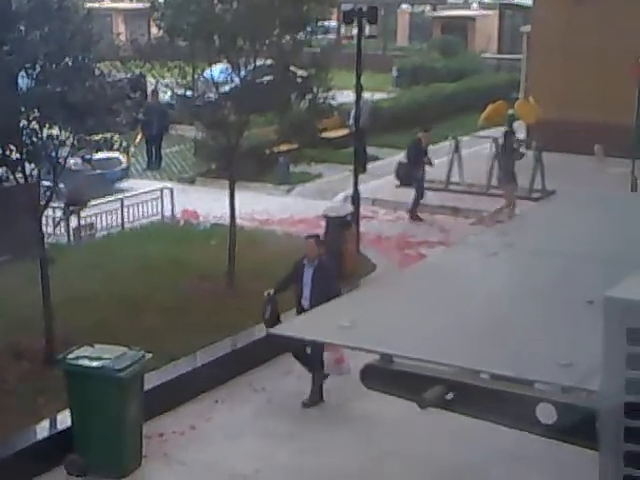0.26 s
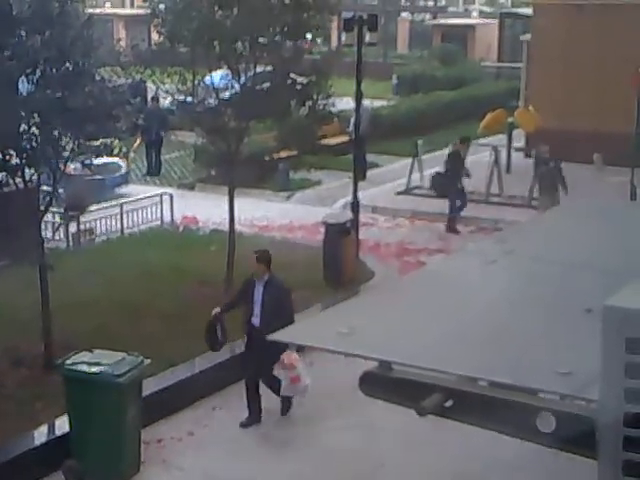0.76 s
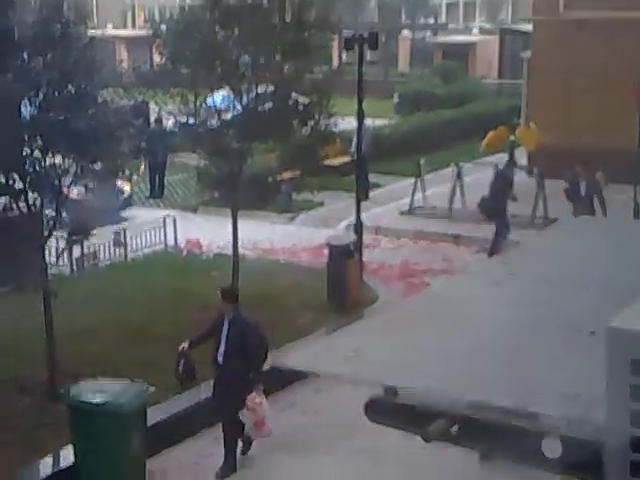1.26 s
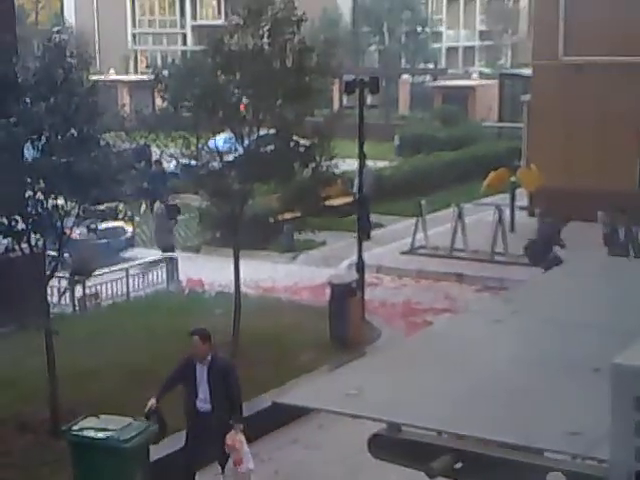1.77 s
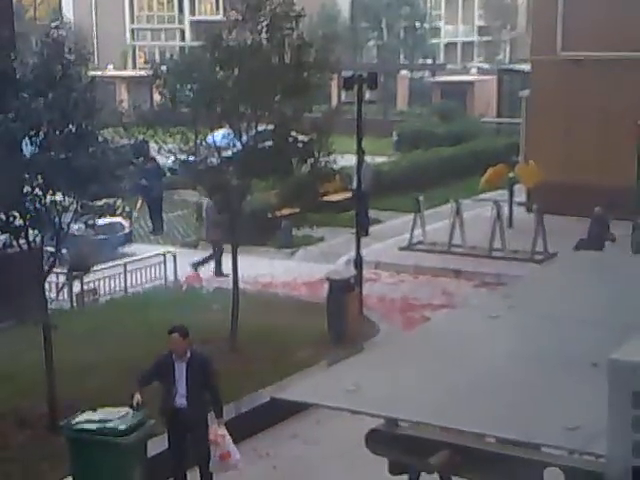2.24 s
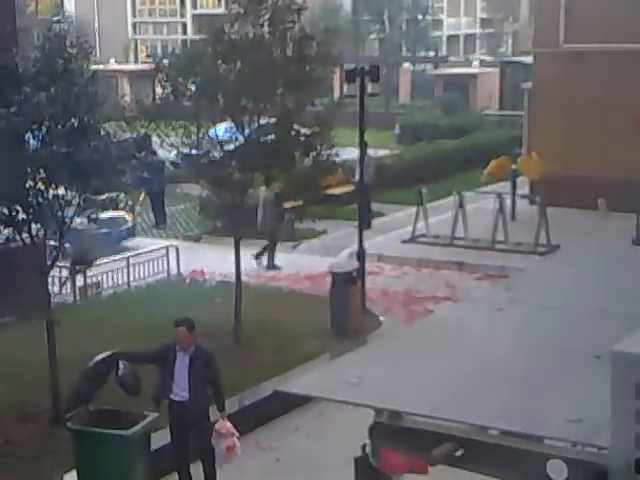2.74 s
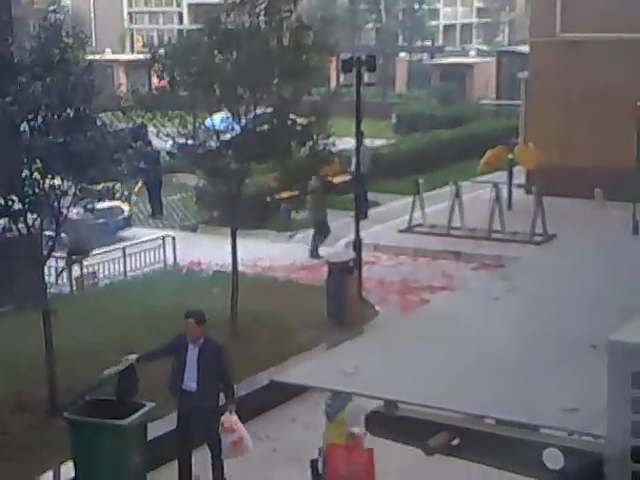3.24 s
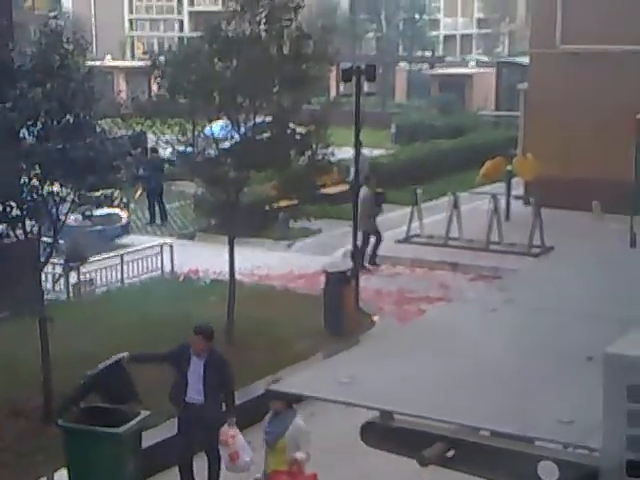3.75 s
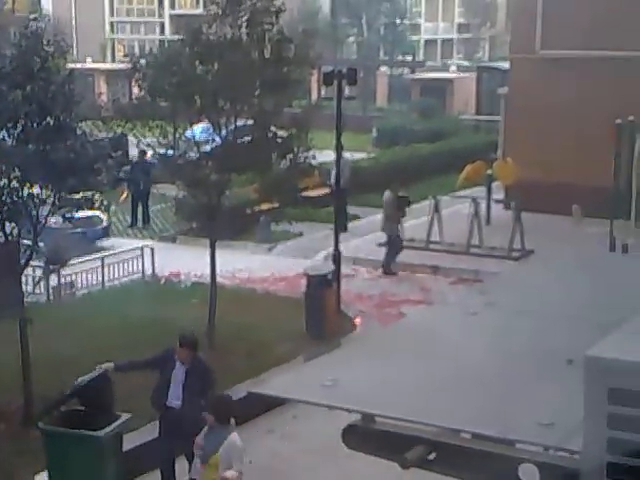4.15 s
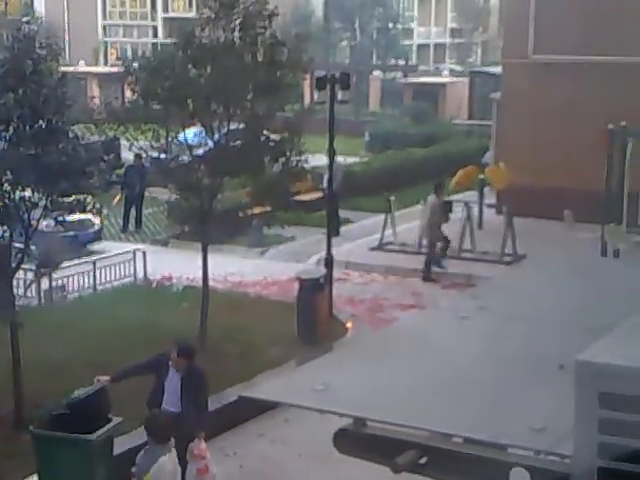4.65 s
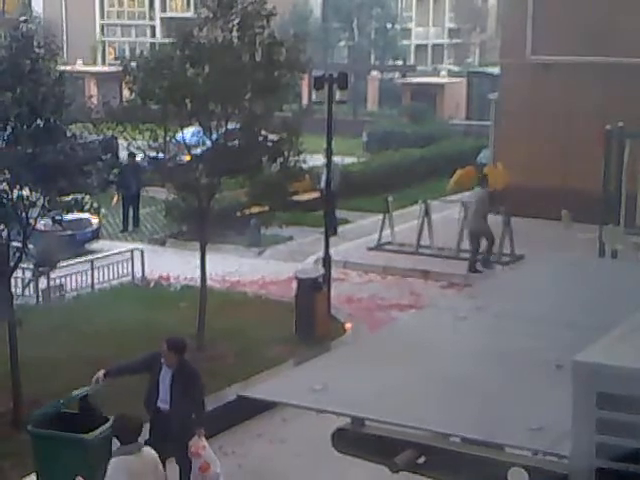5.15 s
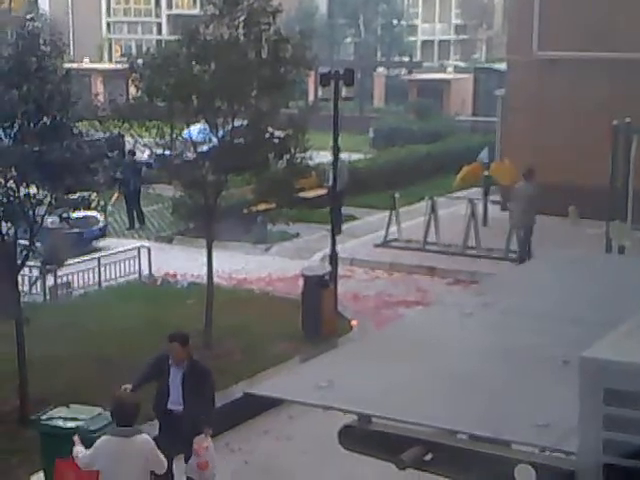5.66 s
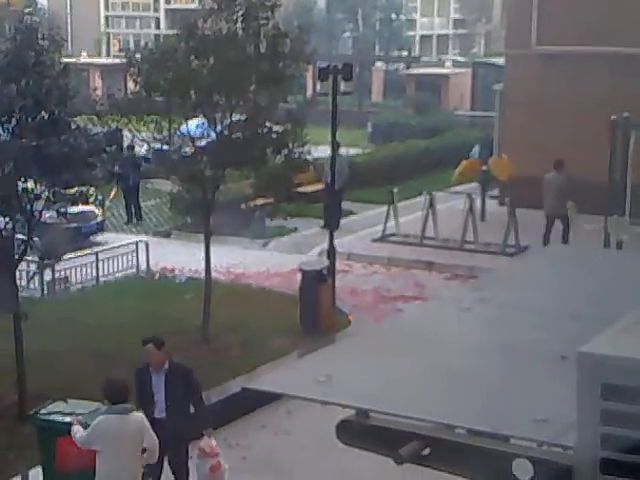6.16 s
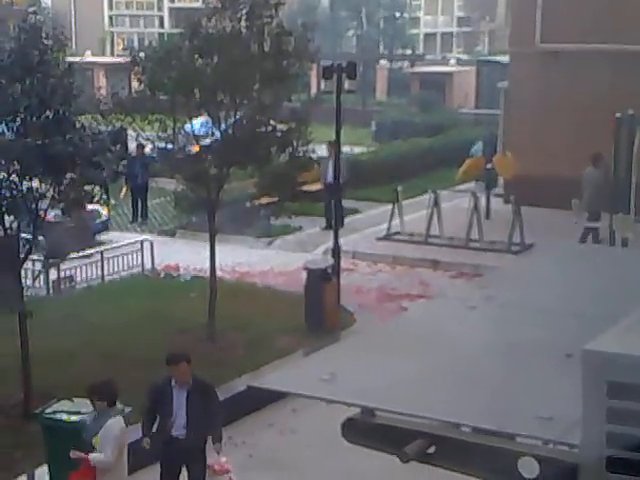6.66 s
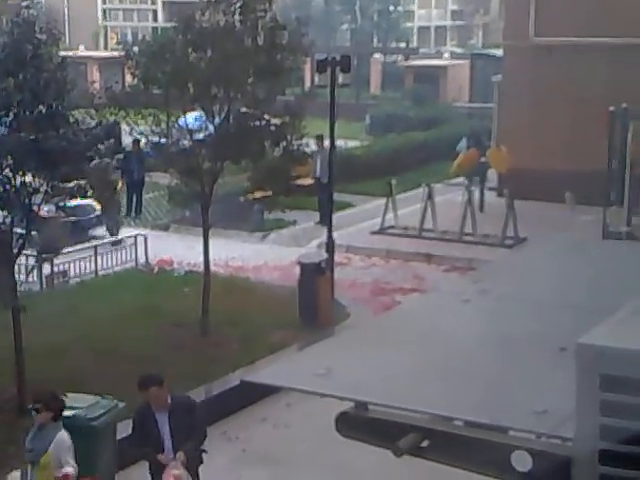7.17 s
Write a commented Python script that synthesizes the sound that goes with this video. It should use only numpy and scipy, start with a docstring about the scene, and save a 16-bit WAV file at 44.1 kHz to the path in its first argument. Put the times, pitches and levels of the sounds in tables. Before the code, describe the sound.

Heard from above in a residential courtyard: a single dry pop, then a big firecracker bang with clustered slapping echoes and a rolling tail. After a faint horn toot, a second, louder bang hits and rumbles away. Dull bumps and two hollow plastic bin lid claps follow. Faint traffic, thin whine and hiss duck after each blast, then swell back; the loudest peaks are flattened.

```python
"""Two big firecrackers go off in a courtyard between apartment blocks, heard from an upstairs microphone.
Each is a set of delayed pulses off ground and walls, then shaped noise that rolls on for over a second.
A dry pop, a single pulse, comes first; dull bumps, bin lid claps and a far horn are decaying noise and tones.
Town noise, a thin whine and hiss sink after each blast and swell back; a limiter flattens the loudest part."""
import sys
import numpy as np
from scipy import signal
from scipy.fft import rfft, irfft
from scipy.io import wavfile
from scipy.ndimage import uniform_filter1d, minimum_filter1d

SR = 44100
rng = np.random.default_rng(int(sys.argv[2]) if len(sys.argv) > 2 else 0)


def master_out(mix):
    """Clip the mix to full scale and print it as 16-bit PCM to the path in sys.argv[1]."""
    frames = np.transpose(np.atleast_2d(mix))
    ceiling = np.clip(frames, -1, 1)
    pcm = np.round(ceiling * 32767).astype(np.int16)
    wavfile.write(sys.argv[1], SR, pcm)


N = 326340
TIME = np.arange(N) / SR  # s
HZ = np.fft.rfftfreq(N, 1 / SR)


def amp(db):
    """Decibels to gain."""
    return 10 ** (np.asarray(db) / 20)


def unit(x):
    """Scales to an rms of one."""
    return x / np.sqrt(np.mean(x ** 2) + 1e-20)


def read(points, hz):
    """A spectrum table, joined on a log-frequency axis."""
    f, value = np.transpose(points)
    return np.interp(np.log(hz + 1), np.log(f), value)


def noise(spectrum):
    """Steady noise of a given colour, with an rms of one."""
    white = rng.standard_normal(N)
    return unit(irfft(rfft(white) * amp(read(spectrum, HZ)), N))


def drift(rate_hz):
    """Random wavering slower than the given rate, with an rms of one."""
    white = rng.standard_normal(N)
    return unit(irfft(rfft(white) * (HZ < rate_hz), N))


def add(mix, s, sound):
    """Mixes a sound in at a time in seconds."""
    part = mix[max(round(s * SR), 0):][:len(sound)]
    part += sound[:len(part)]


def click(gain_db):
    """Causal (minimum-phase) pulse with the given spectrum."""
    mirrored_db = np.concatenate([gain_db, gain_db[-2:0:-1]])
    log_gain = np.log(amp(mirrored_db))
    return np.fft.ifft(np.exp(np.conj(signal.hilbert(log_gain)))).real


def blow(s, rise, decay):
    """Envelope with a quick rise and an exponential fall."""
    age = np.maximum(TIME - s, 0)
    return (1 - np.exp(-age / rise)) * np.exp(-age / decay)


def held(s, length, rise, release):
    """Envelope that rises, holds and dies away."""
    age = TIME - s
    return np.clip(age / rise, 0, 1) * np.exp(-np.maximum(age - length, 0) / release)


# The two firecrackers down in the yard. Each row: start in seconds, blast level in dB, reverberation level
# in dB, factor on the echo delays, factor on the ring time, reverberation tilt in dB per octave.
BANGS = [(1.1661, -9, -14, 1.0, 0.93, 0), (3.8233, -3.5, -10, 1.035, 1.142, -0.1)]
# Paths by ground and walls to the microphone. Each row: delay in seconds before the bang's own factor,
# level in dB relative to the blast, extra bite around 5.8 kHz in dB.
PATHS = [(0, 1, -6), (.0036, -2, 8.5), (.0100, 0, 6), (0.0146, -6, 5), (0.0501, 1.5, 3), (0.057, -3, 3.5),
         (.0645, -2.5, 2), (.129, -8.5, -1.5), (.158, -8.5, -4)]
# Colour of a blast at the microphone. Each row: frequency in Hz, relative level in dB per Hz.
BLAST_COLOUR = [(30, -31), (90, -27.5), (180, -8), (260, -8), (350, -4.5), (470, -9.5), (720, 0.5),
                (1000, -3), (1300, 3), (1700, -1), (2050, -9.5), (4500, -26), (6100, -29), (8400, -45),
                (15000, -63.5)]


def firecrackers(scatter_db=-12, scatter_s=0.0026, bite_hz=5800, loss_db=90, weak_s=.11, weak_db=-11):
    """Each shock arrives by several paths, frayed by rough walls, and then fills the yard."""
    out = np.zeros(N)
    hz, t = np.fft.rfftfreq(2048, 1 / SR), TIME[:1024]
    colour_db = read(BLAST_COLOUR, hz)
    bite = np.exp(-2 * np.log2((hz + 1) / bite_hz) ** 2)
    # treble lost for each second of delay: loss_db per octave above 4 kHz
    loss = loss_db * np.log2(np.maximum(hz / 4000, 1))
    height = abs(click(colour_db)).max()
    for s, db, yard_db, stretch, ring, tilt_db in BANGS:
        # three weaker echoes fall at random within about the first tenth of a second
        weak_echoes = [(weak_s * share, weak_db, 0) for share in rng.random(size=3)]
        for delay, path_db, bite_db in PATHS + weak_echoes:
            shock = click(colour_db + bite_db * bite - delay * loss) / height
            frayed = amp(scatter_db) * rng.standard_normal(len(t)) * np.exp(-t / scatter_s)
            frayed[0] = 1
            arrival = signal.fftconvolve(shock, frayed)
            add(out, s + stretch * delay, amp(db + path_db) * arrival)
        add(out, s, amp(yard_db) * reverberation(ring, tilt_db))
    return out


# Basic ring time of the yard, before each bang's factor and the extra late fall.
# Each row: frequency in Hz, time to fall 60 dB in seconds.
YARD_RING = [(50, 1.7), (200, 1.4), (700, 1.95), (1400, 1.77), (2500, 1.684), (4000, 1.58), (6000, 1.12),
             (9000, 0.72), (15000, 0.49)]


def reverberation(ring, tilt_db, build=0.059, flutter_db=1.5, patch_db=1.0, dulling_db=11, sag_db=3,
                  air_db=9, air_s=0.13):
    """A thicket of echoes from windows and balconies; it fades ever faster, the treble first."""
    grain = amp(1.3 * drift(500))
    late = np.minimum(TIME, 1.5) ** 2  # the level flutters at random, more strongly as the tail fades
    echoes = rng.standard_normal(N) * grain * amp(flutter_db * late * drift(25))
    hz, t, z = signal.stft(echoes, SR, nperseg=512)
    colour = amp(read(BLAST_COLOUR, hz) + tilt_db * np.log2((hz + 100) / 1000))
    # random patches, smoothed over frequency and then time
    patches = uniform_filter1d(rng.standard_normal(z.shape), size=5, axis=0)
    patches = unit(uniform_filter1d(patches, size=8, axis=1))
    treble = np.clip((hz - 1700) / 700, 0, 1)[:, None]
    fall_db = -60 * t / (ring * read(YARD_RING, hz)[:, None])
    fall_db = fall_db - (sag_db + dulling_db * treble) * (t / ring) ** 3
    # the top treble dulls over the first tenths of a second
    edge_db = air_db * np.log2(np.maximum(hz / 2800, 1))[:, None] * (1 - np.exp(-t / air_s))
    z = z * unit(colour)[:, None] * amp(fall_db - edge_db + patch_db * patches)
    tail = signal.istft(z, SR, nperseg=512)[1][:N]
    return tail * (1 - .6 * np.exp(-TIME / build))  # the echoes take a moment to build up


def fizz(level_db=-43, decay_s=.052):
    """The airy top of each blast, high noise which dies within the first few bounces."""
    air = noise([(4000, -20), (7000, 0), (12000, -3), (15500, -10)])  # Hz, dB per Hz
    return air * sum(amp(level_db + yard_db) * blow(s, .002, decay_s) for s, _, yard_db, *_ in BANGS)


# Colour of echoes from distant blocks. Each row: frequency in Hz, relative level in dB per Hz.
ROLL_COLOUR = [(100, -20), (480, -12), (720, 1), (1000, -2), (1250, 0), (1700, -9), (2100, -26),
               (3500, -40), (6200, -39), (9000, -54), (15000, -64)]


def far_roll(level_db=-35, rise_s=.4, decay_s=.8, sinks=.55, flutter_db=2.2, early_s=.05):
    """Each blast comes back from distant blocks as a long, uneven murmur of echoes."""
    echoes = sum(blow(s, rise_s, decay_s) for s, *_ in BANGS)
    level = amp(level_db + sinks * lull_db(early_s) + flutter_db * drift(16))
    return level * echoes * noise(ROLL_COLOUR)


# Standing waves between the walls around the yard.
# Each row: frequency in Hz, width in Hz, level in dB relative to the incoming sound.
WALL_MODES = [(187, 16, 0), (217, 12, -7), (321, 7.9, -0.5), (715, 16, -5.5), (1170, 18, -8.5),
              (1693, 8.9, -8)]


def walls(x):
    """Facing walls make a few frequencies ring."""
    out = x
    for hz, width, db in WALL_MODES:
        b, a = signal.iirpeak(hz, hz / width, SR)
        out = out + amp(db) * signal.lfilter(b, a, x)
    return out


# Colour of the dry pop's pulse. Each row: frequency in Hz, relative level in dB per Hz.
POP_COLOUR = [(20, -19.5), (60, -3), (420, 1.5), (900, -6), (1600, -21.5), (2600, -27), (3300, -44),
              (4100, -42.5), (7000, -80), (12000, -90.5)]


def pop(s=.3074, peak_db=-4, lag_s=.0022, knee_hz=1500, tail_db=-54, tail_s=.018, boom_db=-52, boom_s=.085):
    """One dry pressure pulse, its bass a little behind its treble, with a faint, short tail and a low boom."""
    hz = np.fft.rfftfreq(4096, 1 / SR)
    lag = np.exp(-2j * np.pi * lag_s * knee_hz * np.arctan(hz / knee_hz))
    pulse = irfft(rfft(click(read(POP_COLOUR, hz))) * lag)
    out = np.zeros(N)
    add(out, s, amp(peak_db) * pulse / abs(pulse).max())
    tail = amp(tail_db) * noise(BLAST_COLOUR) * blow(s, .003, tail_s)
    boom = amp(boom_db) * noise(RUMBLE_COLOUR) * blow(s, .003, boom_s)
    return out + tail + boom


# Dull bumps, and first a faint low rustle just before the pop. Each row: start in seconds, level in dB,
# pitch in Hz, decay in seconds, scuff level in dB relative to the bump.
BUMPS = [(.27, -57.5, 201, 0.016, 1), (0.489, -56.5, 302, 0.0094, -0.5), (.648, -45, 60, 0.0075, -5),
         (2.92, -54, 120, .02, -8.5), (3.532, -34.5, 60.7, 0.024, -5.5), (5.439, -50, 170, 0.038, -5.5),
         (6.002, -42.5, 52, .03, 0), (6.75, -39.5, 239, 0.014, 1), (7.13, -28, 110, 0.0082, -14)]


def bumps(scuff_hz=520, rise_s=0.0041):
    """Each bump or rustle is a few low cycles and a soft scuff of low-passed noise."""
    low_pass = signal.butter(4, scuff_hz, fs=SR, output="sos")
    scuff = unit(signal.sosfilt(low_pass, rng.standard_normal(N)))
    out = np.zeros(N)
    for s, db, hz, decay, scuff_db in BUMPS:
        thud = np.sin(2 * np.pi * hz * (TIME - s))
        out += amp(db) * blow(s, rise_s, decay) * (thud + amp(scuff_db) * scuff)
    return out


# Knocks of the bin lid. Each row: start in seconds, relative level in dB, decay in seconds.
LID_KNOCKS = [(2.965, -66, .012), (5.701, -48, 0.013), (5.768, -40, 0.013)]
# Colour of the lid's body. Each row: frequency in Hz, relative level in dB per Hz.
LID_COLOUR = [(200, -8), (500, -10.5), (900, -5), (1300, 3), (1650, -2), (2000, -10.5), (3000, -28),
              (4500, -34), (6500, -43), (9000, -70)]


def bin_lid(wet_db=-17, ring_s=0.12, boom_db=-13, boom_s=.16):
    """A plastic lid ticks as it opens and lands in two claps; each knock has a hollow boom and a faint echo."""
    strokes, boom = np.zeros(N), np.zeros(N)
    for s, db, decay in LID_KNOCKS:
        strokes += amp(db) * (blow(s, 0.0023, decay) + amp(wet_db) * blow(s, 0.018, ring_s))
        boom += amp(db + boom_db) * blow(s, .01, boom_s)
    return amp(5.5) * noise(LID_COLOUR) * strokes + noise(RUMBLE_COLOUR) * boom


def far_horn(s=3.46, length_s=.24, rise_s=.08, hz=560, level_db=-47.5, fall_db=5, release_s=.05):
    """One short, faint toot of three harmonics that wavers in pitch and level on its way."""
    phase = 2 * np.pi * np.cumsum(hz * (1 + .014 * drift(40))) / SR
    tone = sum(amp(-fall_db * k + 3.3 * drift(6.5)) * np.sin((k + 1) * phase) for k in range(3))
    return amp(level_db) * held(s, length_s, rise_s, release_s) * tone


# Colour of distant traffic, also of the low booms. Each row: frequency in Hz, relative level in dB per Hz.
RUMBLE_COLOUR = [(20, -10.5), (45, 0), (95, 2.5), (190, -0.5), (330, -6), (550, -16.5), (1200, -42),
                 (4000, -80)]
# Colour of the town's wash. Each row: frequency in Hz, relative level in dB per Hz.
WASH_COLOUR = [(250, -7), (520, -5.5), (720, 1.5), (1000, -2.5), (1220, 0.5), (1700, -6.5), (2100, -18.5),
               (3500, -27), (8000, -50)]
# Brief swells of street noise. Each row: start in seconds, length in seconds, level in dB before wavering.
SWELLS = [(-.06, .17, -73), (.97, .2, -76.5), (3.44, .36, -49.5)]


def town(rumble_db=-49.5, wash_db=-54, waver_db=2, lumpy_db=2, rumble_sinks=1.01, wash_sinks=1.35, early_s=.06):
    """Uneven traffic rumble, and a wash whose low and high halves waver apart; each sinks by its own amount."""
    lull = lull_db(early_s)
    rumble = amp(rumble_db + rumble_sinks * lull + lumpy_db * drift(14)) * noise(RUMBLE_COLOUR)
    swells = sum(amp(db) * held(s, length, .09, .04) for s, length, db in SWELLS)
    wash = np.hypot(amp(wash_db + wash_sinks * lull), swells) * noise(WASH_COLOUR)
    low = irfft(rfft(wash) * (HZ < 1000), N)
    high = wash - low
    return rumble + low * amp(waver_db * drift(12)) + high * amp(waver_db * drift(17))


# Partials of the thin whine. Each row: frequency in Hz, level in dB relative to the other partials.
WHINE = [(5803, -79), (8942, -89), (9835, -87), (10250, -88), (10810, -85), (10869, -75), (10928, -76),
         (11197, -85), (11612, -80), (12086, -85), (12500, -84), (12974, -85), (13388, -86), (13862, -84),
         (14277, -86), (14750, -85), (15165, -89), (15638, -87)]
# Colour of the hiss. Each row: frequency in Hz, relative level in dB per Hz.
HISS_COLOUR = [(500, -2), (2200, 2.5), (3500, 3.5), (6000, 3.5), (8000, -1), (10000, -4), (10900, 2),
               (11700, 1), (15500, -6)]


def electronics(whine_db=-70.3, hiss_db=-66.8, waver_db=2, whine_sinks=1.05, hiss_sinks=1.0):
    """A thin whine of wavering sine partials and a hiss of noise, which swell and sink together."""
    whine = np.zeros(N)
    for hz, db in WHINE:
        whine += amp(db + waver_db * drift(12)) * np.sin(2 * np.pi * (hz * TIME + rng.random()))
    lull = lull_db(0)
    hiss = amp(hiss_db + hiss_sinks * lull) * noise(HISS_COLOUR)
    return amp(whine_db + whine_sinks * lull) * unit(whine) + hiss


# Lulls in the background, the first already under way.
# Each row: start in seconds, starting level in dB, time spent sinking in seconds (before any early turn).
LULLS = [(-1.0, 0, 2.3), (1.17, -10, 1.44), (3.93, 0, 1.66)]


def lull_db(early_s, drop_db=13, drop_s=.3, slide_db_per_s=6.8, swell_db_per_s=31):
    """Background level: it drops quickly, slides on slowly, then swells steadily to full, some layers early."""
    level = np.zeros(N)
    for s, start_db, length in LULLS:
        age = TIME - s
        sinking = np.clip(age, 0, length - early_s)
        sunk = drop_db * (1 - np.exp(-sinking / drop_s)) + slide_db_per_s * sinking
        regained = swell_db_per_s * (age - sinking)
        level = np.where(age < 0, level, np.minimum(start_db - sunk + regained, 0))
    return level


def scene():
    """All sources at one microphone; the blasts, far echoes and town ring between the walls."""
    yard = walls(firecrackers() + far_roll() + town())
    return (yard + fizz() + far_horn() + pop() + bumps() + bin_lid() + electronics())[None]


def record(dry, ceiling=.69, edge_hz=15750):
    """A fast limiter holds the peaks down; then a steep low-pass limits the band."""
    gain = np.minimum(1, ceiling / (abs(dry) + 1e-9))
    gain = minimum_filter1d(gain, size=61)  # samples; the gain dips just ahead of each peak
    gain = uniform_filter1d(uniform_filter1d(gain, size=31), size=31)
    low_pass = signal.firwin(511, edge_hz, window=("kaiser", 9), fs=SR)
    return signal.oaconvolve(dry * gain, low_pass[None], "same")


dry = scene()
out = record(dry)
master_out(out)
```